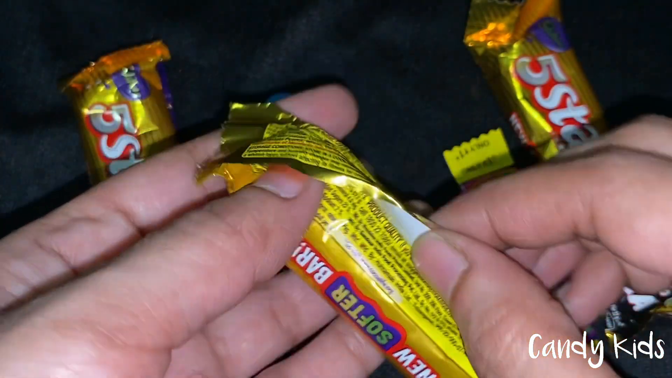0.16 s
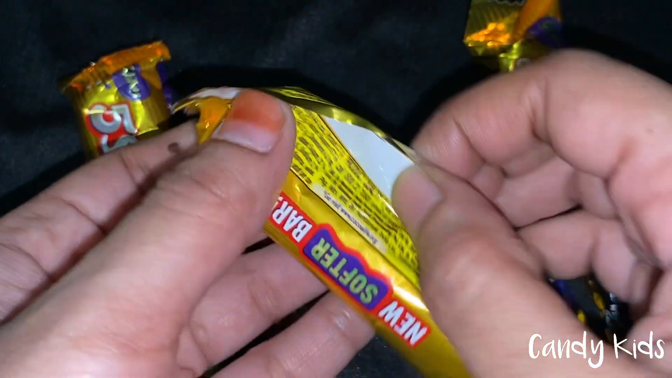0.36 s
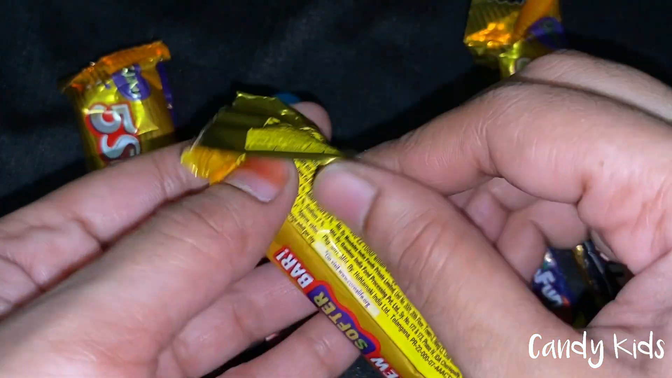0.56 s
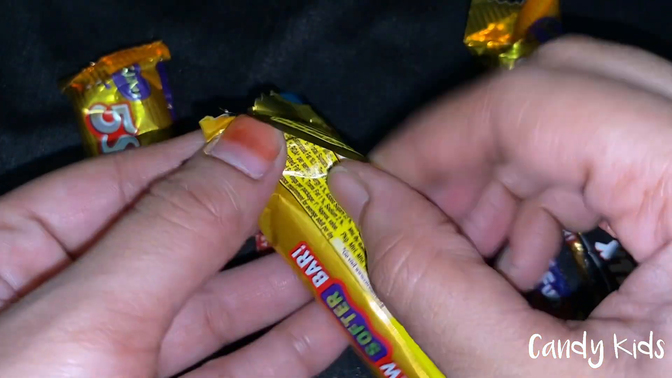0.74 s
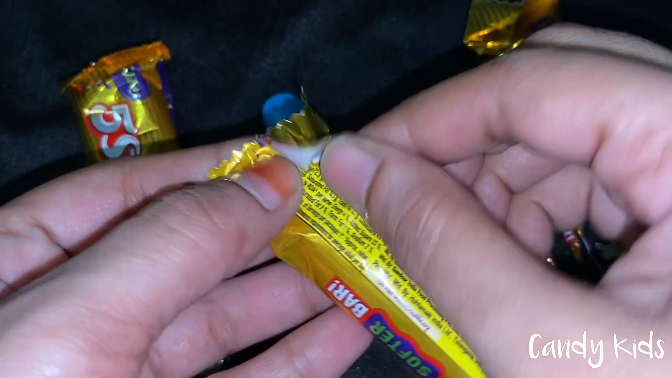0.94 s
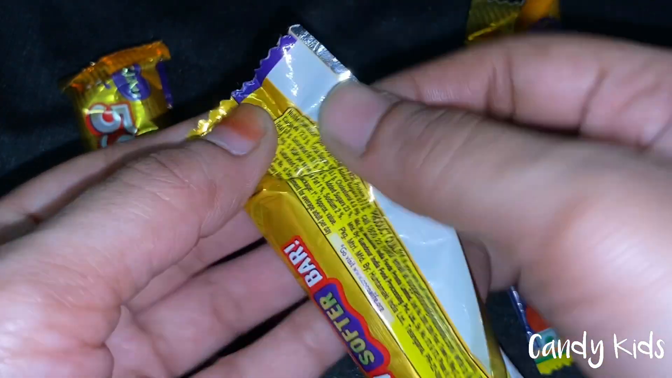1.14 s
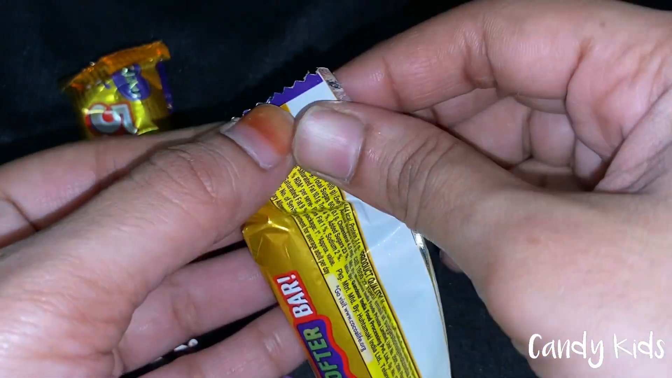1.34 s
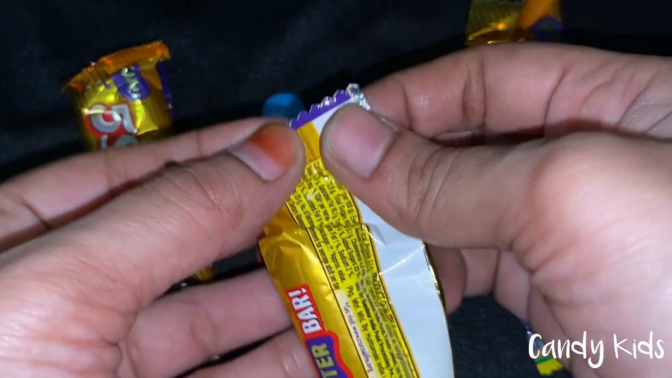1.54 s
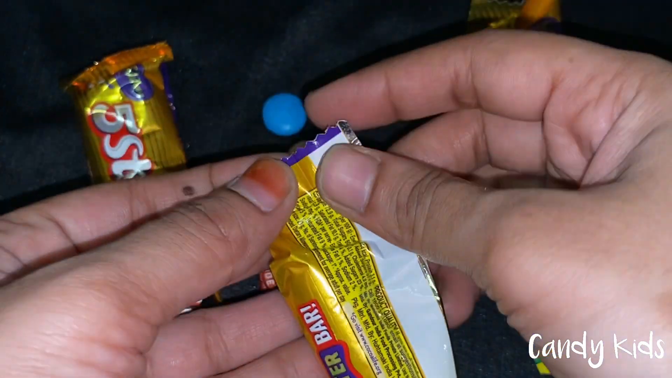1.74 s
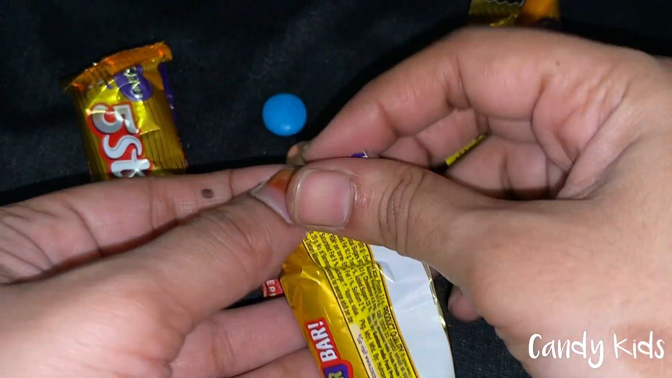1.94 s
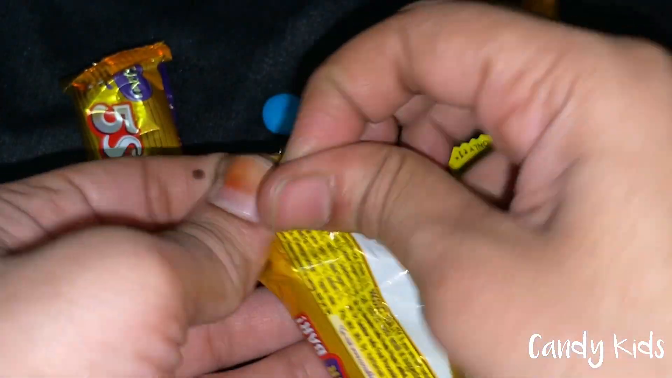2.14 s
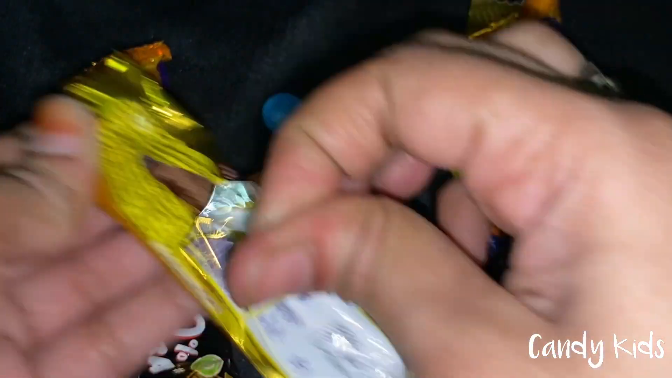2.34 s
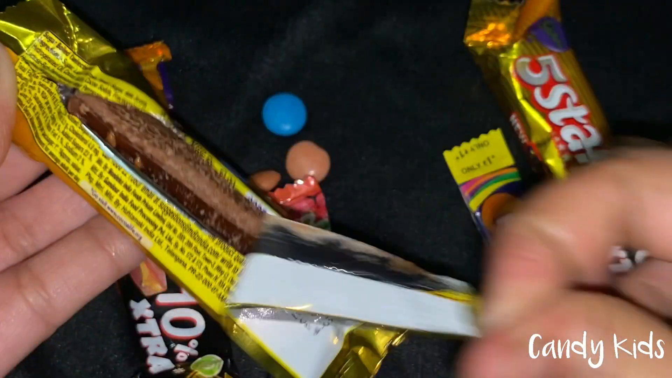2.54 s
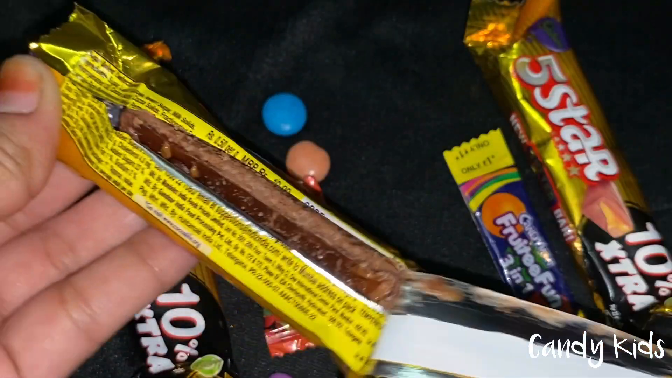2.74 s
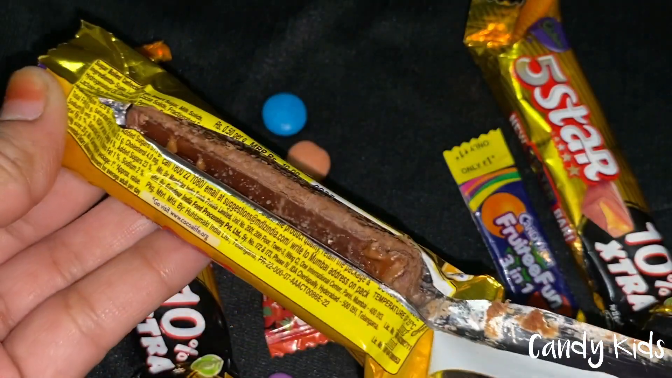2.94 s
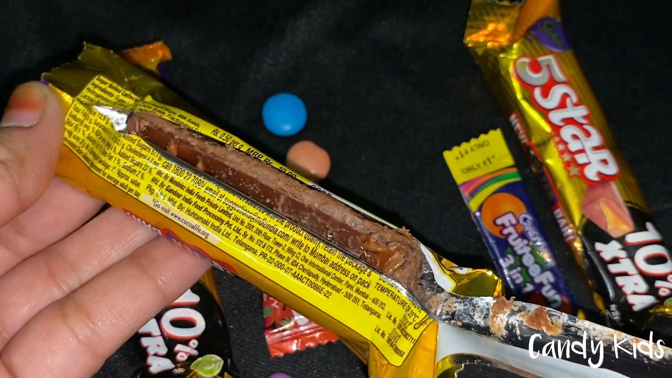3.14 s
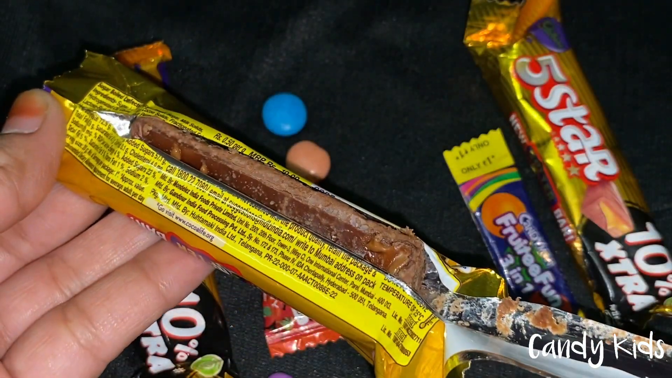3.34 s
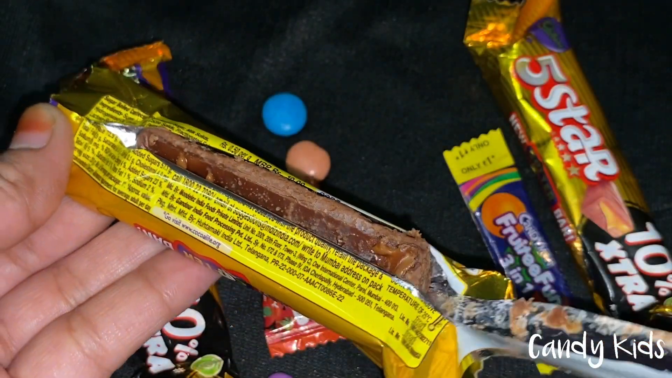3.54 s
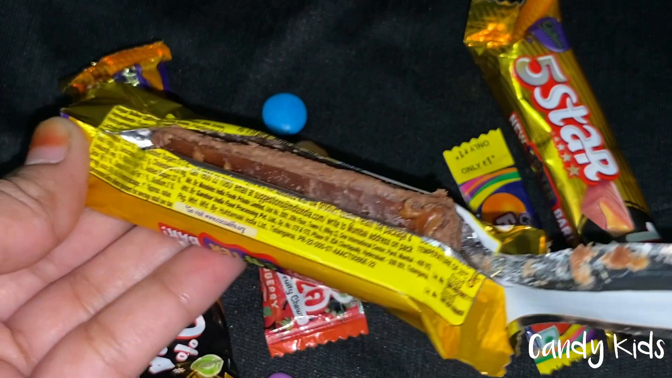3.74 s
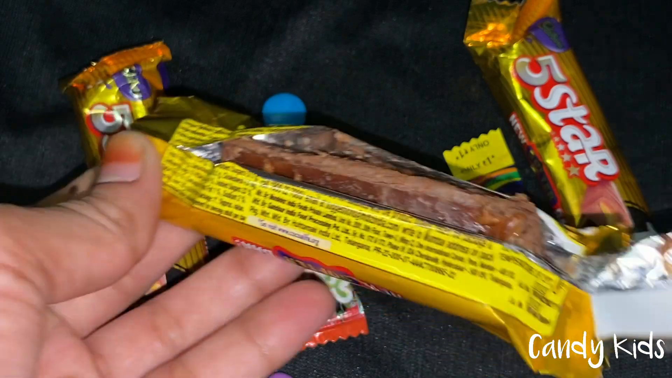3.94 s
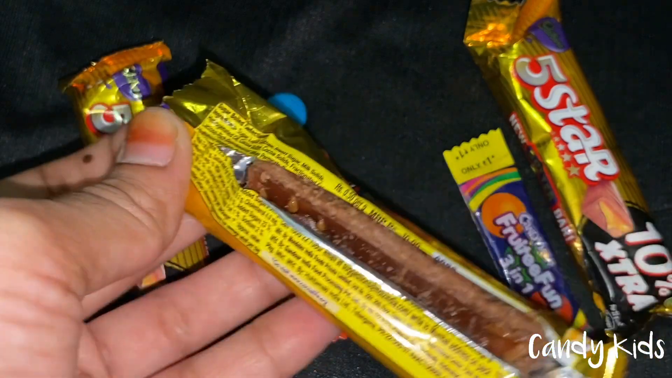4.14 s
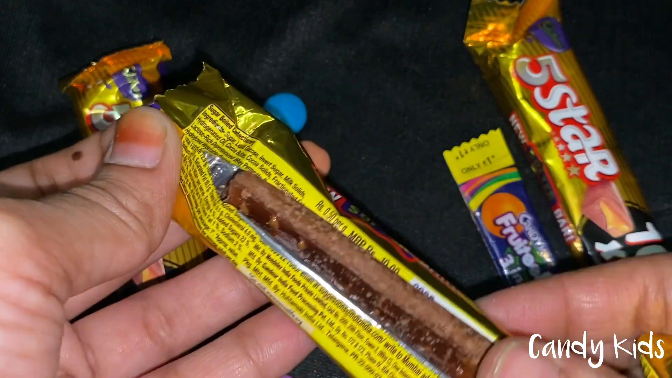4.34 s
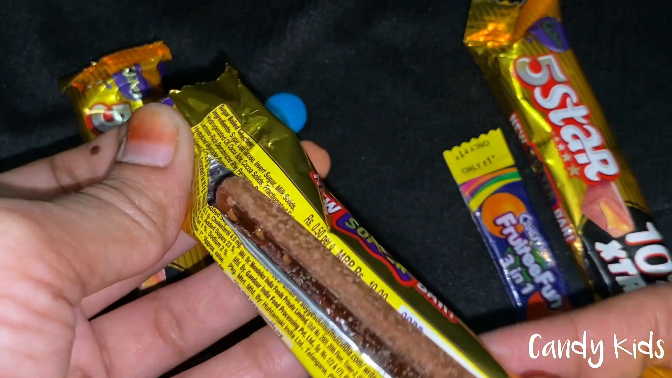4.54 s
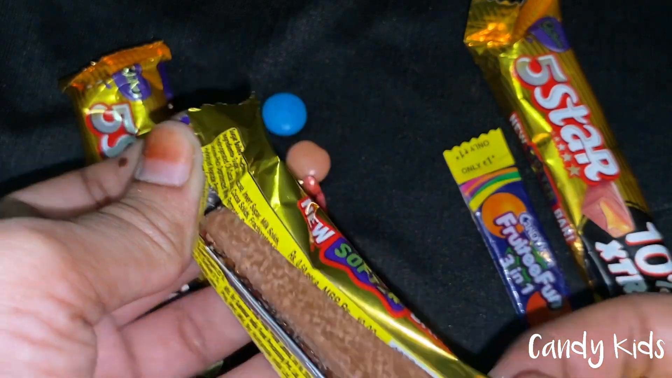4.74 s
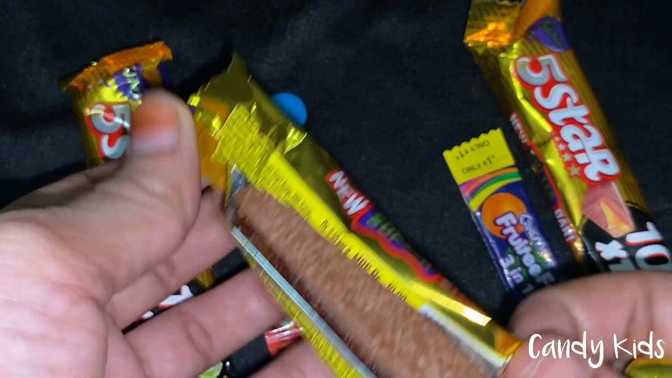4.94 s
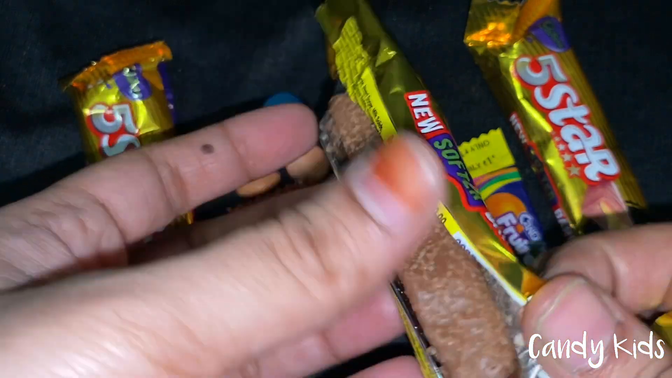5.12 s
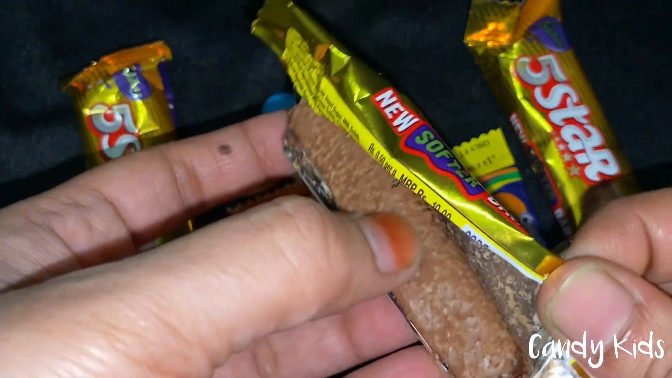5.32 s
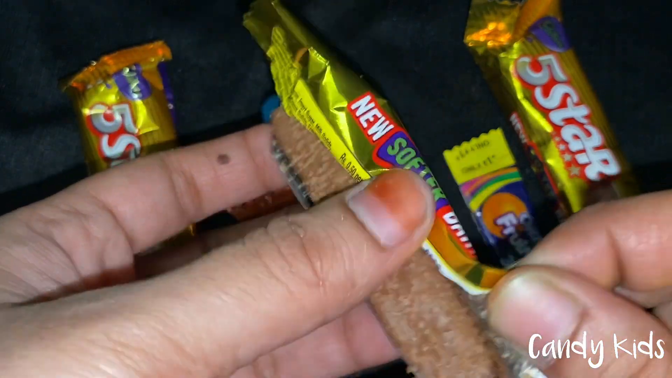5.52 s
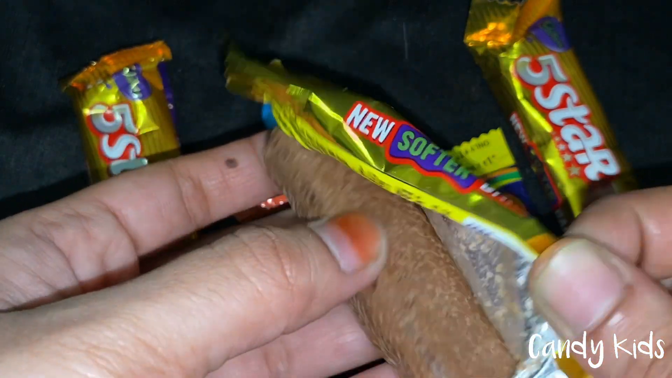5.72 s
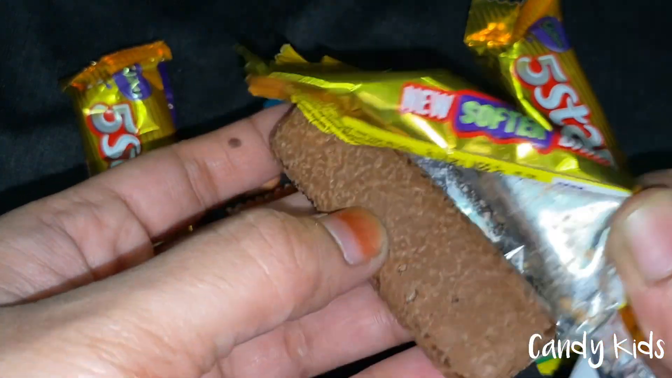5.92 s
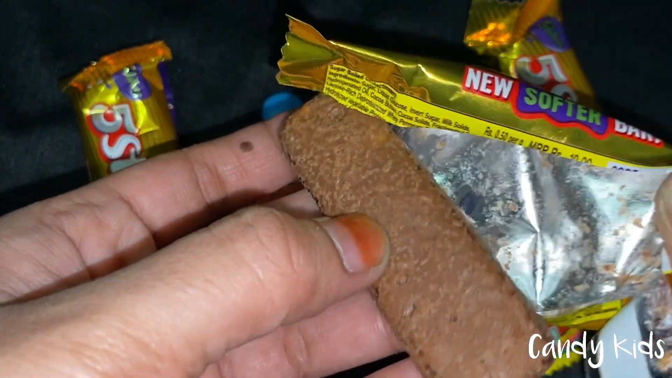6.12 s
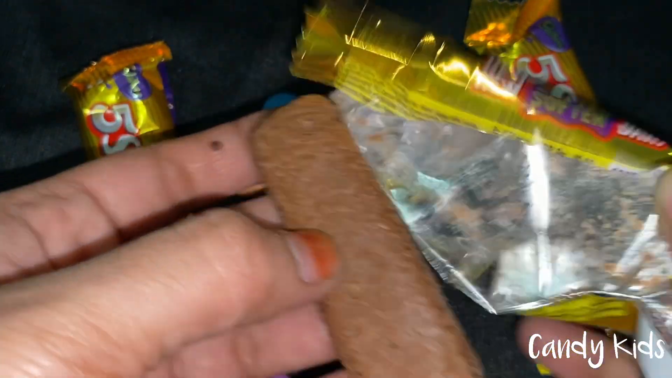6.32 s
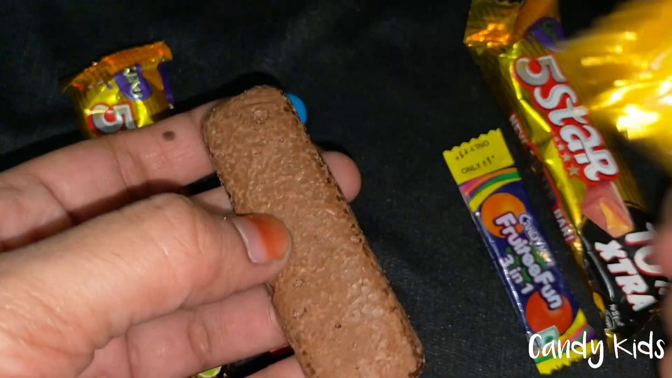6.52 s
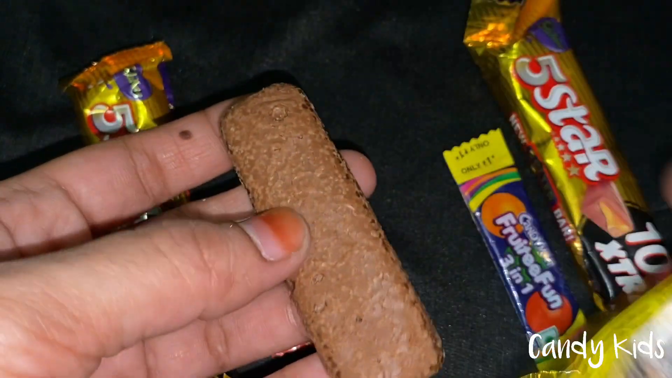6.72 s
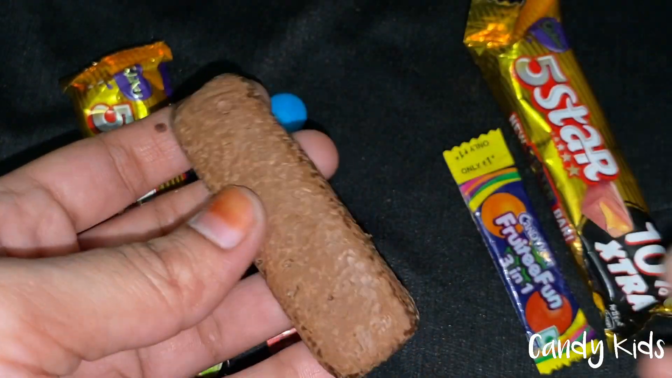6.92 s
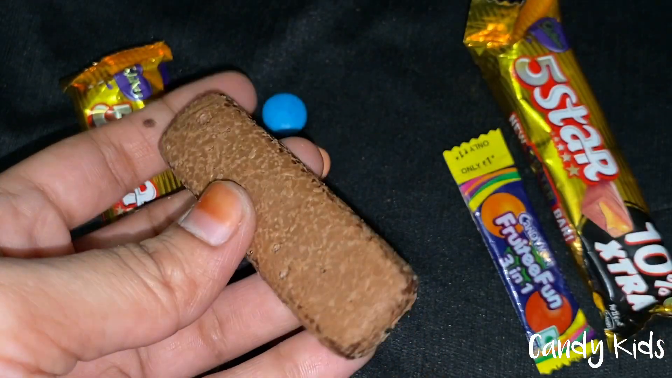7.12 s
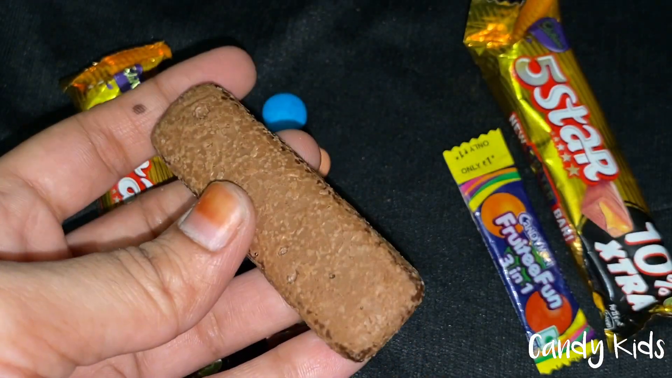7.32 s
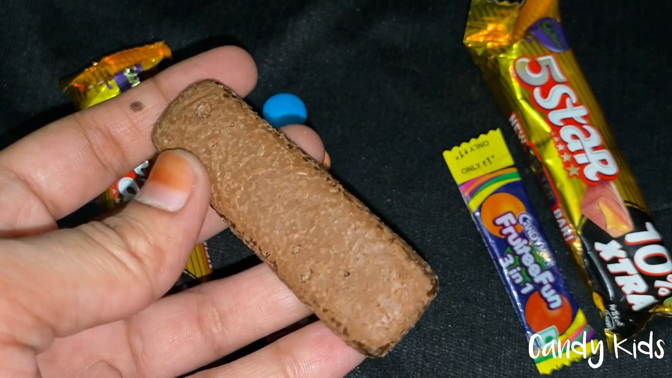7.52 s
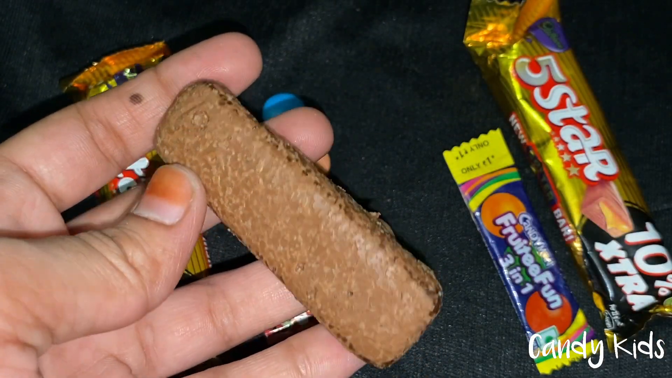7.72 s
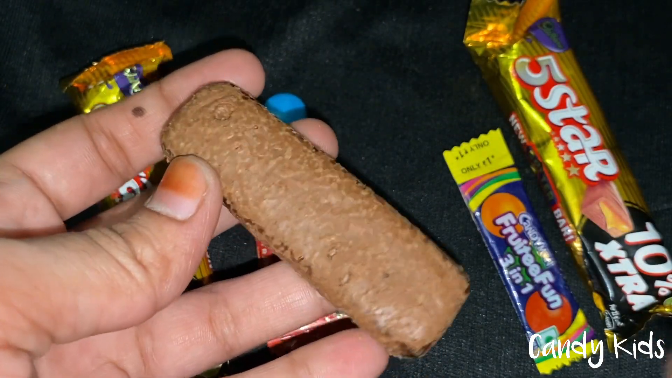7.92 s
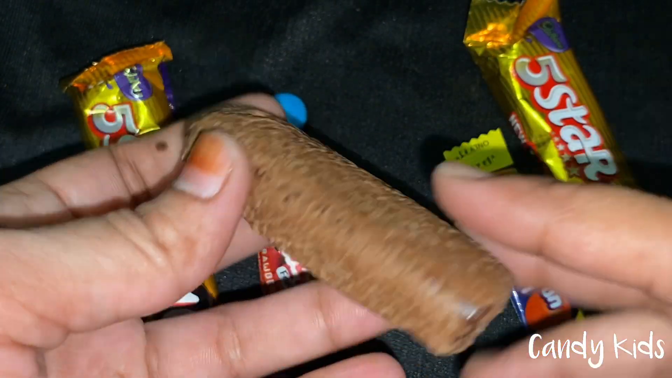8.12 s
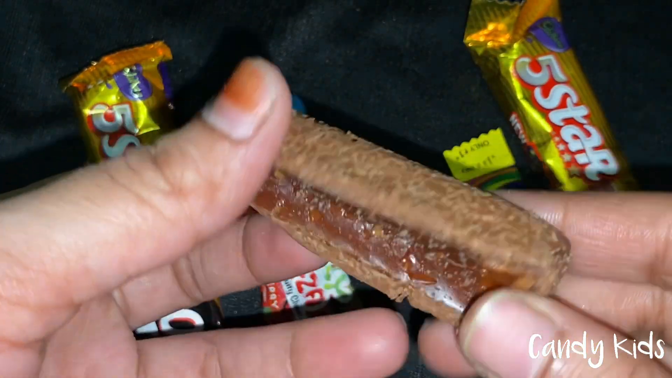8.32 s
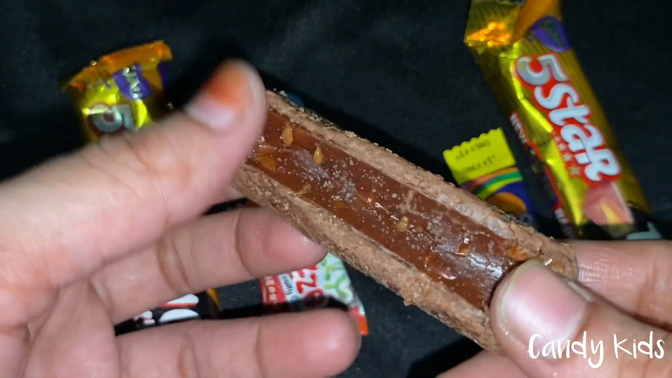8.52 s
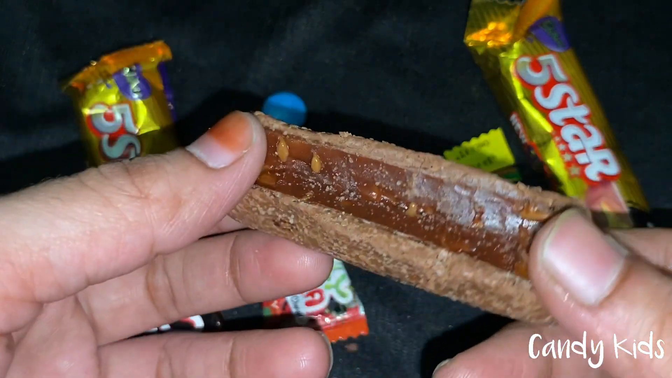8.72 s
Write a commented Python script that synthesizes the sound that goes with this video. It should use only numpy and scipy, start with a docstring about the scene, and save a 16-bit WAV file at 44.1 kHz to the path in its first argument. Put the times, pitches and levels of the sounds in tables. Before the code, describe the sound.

A foil candy wrapper is crinkled, torn open and pulled off by hand close to the microphone. It crackles in uneven bursts with sharp snaps, pauses briefly, then resumes with swishes and a few dull pops. The crinkling peaks as the empty wrapper is crumpled and laid aside. Small birds chirp with a slight echo in the background during the first two thirds, over a low rumble and faint hum.

```python
"""Unwrapping a candy bar

A foil wrapper is crinkled, torn open and pulled off close to a phone's two microphones.
Each squeeze of the fingers sets off a crackle, big creases buckle in single snaps, and the
slack foil slides and pops dully. Small birds chirp with an echo in the background,
over a low rumble with a little mains hum."""
import sys
import numpy as np
from scipy import signal
from scipy.fft import rfft, irfft
from scipy.io import wavfile

SR = 44100
rng = np.random.default_rng(int(sys.argv[2]) if len(sys.argv) > 2 else 0)


def wav_record(signal):
    """Record a signal, one row per channel, as 16-bit PCM in the file named by sys.argv[1]."""
    frames = np.transpose(np.atleast_2d(signal))
    bounded = np.clip(frames, -1, 1)
    # unit amplitude maps onto the largest positive 16-bit level
    quanta = np.round(bounded * 32767).astype(np.int16)
    wavfile.write(sys.argv[1], SR, quanta)


N = 386316
TIME = np.arange(N) / SR


def from_db(db):
    return 10 ** (np.asarray(db) / 20)


def rms_one(x):
    """Scale each row to an average power of 1."""
    return x / np.sqrt(np.mean(x ** 2, axis=-1, keepdims=True) + 1e-20)


def at_hz(points, hz):
    """Read a curve of (frequency, value) points on a logarithmic frequency axis."""
    points = np.array(points)
    return np.interp(np.log(hz + 1), np.log(points[:, 0]), points[:, 1])


def frequencies(size):
    return np.fft.rfftfreq(size, 1 / SR)


def wander(step_s):
    """A random curve that takes a new direction every step."""
    steps = TIME / step_s
    turns = np.clip(rng.standard_normal(int(steps[-1]) + 2), -2, 2)
    return np.interp(steps, np.arange(len(turns)), turns)


def place(times, sounds):
    """Add up short sounds at their start times, channel by channel."""
    at = (np.asarray(times) * SR).astype(int)[:, None] + np.arange(sounds.shape[-1])
    return np.array([np.bincount(np.maximum(at, 0).ravel(), channel.ravel(), N)[:N] for channel in sounds])


def echoes(x, fade_s, gap_s):
    """A wash of reflections, different at each microphone, that drops 60 dB in fade_s."""
    t = TIME[:SR]
    tail = rng.standard_normal((2, SR)) * from_db(-60 * t / fade_s) * (t > gap_s)
    return signal.fftconvolve(x[None], rms_one(tail) / np.sqrt(SR), axes=1)[:, :N]


# tone of the rumble and hiss: (frequency [Hz], relative level [dB])
RUMBLE_TONE = [(20, -25), (40, -9.5), (60, 3.5), (100, 1), (160, -5.5), (300, -15), (600, -24.5),
               (2000, -38), (3000, -38.5), (7000, -48.5), (16000, -48.5)]
# mains hum: (frequency [Hz], level [dB])
HUM = [(100, -50), (150, -56.5)]


def background(rumble_db=-42.5):
    """Steady rumble and mains hum, alike at both microphones; the hiss differs between them."""
    hz = frequencies(N)
    side_db = at_hz([(100, -14.0), (300, -6.0), (3000, -1.0)], hz)
    tone_db = at_hz(RUMBLE_TONE, hz) + np.outer([0, 1], side_db)
    mid, side = irfft(rfft(rng.standard_normal((2, N))) * from_db(tone_db), N)
    hum = sum(np.sqrt(2) * from_db(db) * np.sin(2 * np.pi * pitch * TIME) for pitch, db in HUM)
    return from_db(rumble_db) * (mid + side * [[1], [-1]]) / np.std(mid) + hum


def whistles(notes, waver_hz, flicker_db):
    """Each note (start, length, pitches, level) glides and quivers as it swells and fades."""
    song = np.zeros(N)
    quiver = waver_hz * wander(step_s=.003)
    flicker = from_db(flicker_db * wander(step_s=.01))
    for start, length, pitches, db in notes:
        at = np.flatnonzero((TIME >= start) & (TIME < start + length))
        progress = np.linspace(0, 1, len(at))
        hz = np.interp(progress, np.linspace(0, 1, len(pitches)), pitches) + quiver[at]
        swell = rms_one(np.sqrt(progress * np.abs(np.sin(np.pi * progress))) * flicker[at])
        song[at] += from_db(db) * swell * np.sqrt(2) * np.sin(2 * np.pi * np.cumsum(hz) / SR)
    return song


# gliding notes: (start [s], length [s], first pitch [Hz], last pitch [Hz], level [dB])
GLIDES = [(0, 0.0031, 7190, 7460, -18.5), (0.601, 0.072, 7700, 7600, -27.5),
          (0.952, 0.086, 7720, 6750, -24.5), (1.374, 0.076, 7280, 6470, -25.5),
          (2.973, 0.075, 3270, 3405, -35.5), (3.233, 0.12, 5440, 5555, -33), (3.461, 0.18, 2776, 3125, -30),
          (3.717, 0.039, 4520, 3400, -23.5), (3.938, 0.14, 4644, 4820, -28),
          (4.179, .21, 3044, 3840, -30.5), (4.795, 0.14, 3170, 3365, -35.5),
          (4.97, 0.085, 4020, 4505, -31.5), (5.51, 0.058, 7100, 6550, -36), (5.629, 0.046, 4590, 4325, -29)]
# a flourish whips up and falls back, in equal steps of time: (pitch [Hz])
FLOURISH_HZ = [3700, 3700, 3900, 3970, 4580, 5030, 4580, 3900]
# the flourishes: (start [s], length [s], level [dB])
FLOURISHES = [(2.592, 0.092, -29.5), (2.882, .117, -26.5)]


def far_bird(arch=1.0252):
    """A rough song of flourishes and of glides that bow upwards in the middle."""
    glides = [(start, length, [first, (first + last) / 2 * arch, last], db)
              for start, length, first, last, db in GLIDES]
    flourishes = [(start, length, FLOURISH_HZ, db) for start, length, db in FLOURISHES]
    return whistles(glides + flourishes, waver_hz=90, flicker_db=5)


def bending(hz, lag_s):
    """High notes run through foil faster, so the lows arrive late (by lag_s at 1 kHz)."""
    return np.exp(-4j * np.pi * lag_s * np.sqrt(1000 * hz))


# tone of a typical crease: (frequency [Hz], relative level [dB])
FOIL_TONE = [(150, -6.5), (400, -9.5), (850, -3), (1700, -1), (2700, -3.5), (5000, 0.5), (7500, -0.5),
             (9500, -3), (11500, -9), (15500, -11)]


def buckles(body_db, treble_db, flutter_db, facet_db, size, rise_s=.0005, snap_s=.00045, flutter_s=.003):
    """One click per buckling crease, all equally strong; the sheet flutters briefly after each."""
    hz, count = frequencies(size), len(body_db)
    t = np.maximum(np.arange(size) / SR - .0005, 0)
    decay = np.exp(-t / snap_s) + from_db(flutter_db) * np.exp(-t / flutter_s)
    envelope = (1 - np.exp(-t / rise_s)) * decay
    # each crease reaches the two microphones a little differently
    mid, side = rng.standard_normal((2, count, size)) * envelope
    side *= from_db(-16.5)
    burst = np.array([mid + side, mid - side])
    # big facets (flat patches of foil) add body, below 2.7 kHz; small ones add treble, above 8 kHz
    body = np.outer(body_db, at_hz([(2200, 0.95), (3400, 0.0049)], hz))
    treble = np.outer(treble_db, at_hz([(5500, 0.11), (9500, 0.99)], hz))
    # every facet favours a pitch of its own
    facet_hz = 3800 * 2 ** rng.uniform(-1.12, 1, (count, 1))
    ring = facet_db * np.exp(-10 * np.log2((hz + 1) / facet_hz) ** 2)
    tone = from_db(at_hz(FOIL_TONE, hz) + body + treble + ring)
    return rms_one(irfft(rfft(burst) * tone * bending(hz, lag_s=.0007))) / np.sqrt(size)


def fingers(movements, attack_s=.012, release_s=.028):
    """Effort on the foil and its body in dB: every movement builds up, holds and lets go."""
    power, body = np.full(N, 1e-14), np.zeros(N)
    for start, length, db, body_db in movements:
        at = slice(*np.searchsorted(TIME, [start, start + length + 10 * release_s]))
        t = TIME[at] - start
        envelope = np.minimum(t / attack_s, 1) * np.exp(-np.maximum(t - length, 0) / release_s)
        push = (from_db(db) * envelope) ** 2
        power[at] += push
        body[at] += push * body_db
    return np.sqrt(power), body / power


def crackle(effort, body, treble_db, per_s, spread_db, level_db, variety_db=4):
    """Many small creases buckle: harder handling makes them louder and more frequent."""
    rate = per_s * np.sqrt(effort / np.mean(effort))
    at = np.flatnonzero(np.diff(np.floor(np.cumsum(rate) / SR)))
    jitter, loudness, low_shift, high_shift = rng.standard_normal((len(at), 4)).T
    times = np.abs(at / SR + .5 * jitter / np.maximum(rate[at], per_s))
    spread = rms_one(from_db(spread_db * np.clip(loudness, -2, 2)))
    strength = spread * effort[at] * np.sqrt(SR / rate[at])
    low = body[at] + variety_db * low_shift
    high = treble_db - 0.18 * body[at] + variety_db * high_shift   # big facets are duller
    clicks = buckles(low, high, flutter_db=-22, facet_db=9, size=512)
    return place(times, clicks * strength[:, None] * from_db(level_db))


# the fingers keep stirring the foil lightly: (start [s], length [s], level [dB], body [dB])
HANDLING = [(0, 1.2, -39, 13), (1.27, .3, -47, 0.5), (1.88, .95, -48, 12), (3.601, 2.0, -50, 6),
            (5.597, 1.6, -41, 16)]


def rustle():
    """Tiny creases blur into a fine rustle under both light handling and squeezes."""
    return crackle(*fingers(SQUEEZES + HANDLING), treble_db=0.5, per_s=750, spread_db=3, level_db=-9)


def settling_ticks(level_db=-45.5):
    """Creases settle with lone bright ticks while the foil is held."""
    held = [(start, length, level_db, body_db) for start, length, _, body_db in HANDLING]
    return crackle(*fingers(held), treble_db=9, per_s=22, spread_db=4, level_db=0)


# one clear whistle: (start [s], length [s], pitches [Hz], level [dB])
OPENING_WHISTLE = (.066, .1, [3850, 4150, 4185], -21.5)
# a fainter bird repeats one falling chirp: (start [s])
CHIRPS = [.775, 1.356, 1.548, 1.747, 1.96]


def near_birds():
    """One bird whistles, then gives four pips, each a little lower; a fainter one chirps."""
    first_s, step_s, pip_s, pip_hz, fall_hz, pip_db = .203, .077, .028, 3670, 45, -28.5
    chirp_s, chirp_hz, chirp_db = .046, [4350, 3560], -50.5
    pips = [(first_s + k * step_s, pip_s, pip_hz - fall_hz * np.array([k - 1, k + 1]), pip_db)
            for k in range(4)]
    chirps = [(start, chirp_s, chirp_hz, chirp_db) for start in CHIRPS]
    return whistles([OPENING_WHISTLE] + pips + chirps, waver_hz=25, flicker_db=2)


def birds():
    """The far bird is heard mostly as echo, the near ones more directly; all sit a little right."""
    far, near = far_bird(), near_birds()
    reflected = echoes(from_db(0.5) * far + from_db(1.5) * near, fade_s=0.34, gap_s=0.0036)
    return (from_db(-13) * far + near + reflected) * from_db([[-1.6], [1.6]])


# squeezes and pulls of the fingers: (start [s], length [s], level [dB], body [dB])
SQUEEZES = [(0.092, .16, -30, -7.5), (0.399, .22, -27, 1), (.69, .18, -31, 0.5), (.89, .13, -29.5, -6),
            (1.11, .08, -35, -2.5), (1.379, .09, -36, -3), (2.205, .04, -26, 6), (2.281, .16, -33.5, 3),
            (2.71, .10, -34, -3.5), (3.60, .04, -39, -2), (4.04, .06, -35, 4.5), (4.209, .12, -36, 5),
            (4.64, .11, -36, -3), (4.839, .05, -31, 8.5), (5.168, .06, -38, 3), (5.388, .05, -38, 7),
            (5.53, .07, -37.5, -2.5), (5.651, .18, -34, 3.5), (5.87, .19, -31, 4.5), (6.142, .08, -33, 12),
            (6.31, .025, -28, 8.5), (6.44, .16, -32, -1.5), (6.62, .05, -21, 2), (6.699, .17, -29, 0.5),
            (6.91, .06, -24, 2.5), (7.06, .09, -22, -4), (7.19, .25, -41, -3.5), (7.42, .02, -26, -10),
            (7.50, .08, -39, 1), (7.789, .06, -48, 0), (7.909, .025, -36, 7)]


def squeeze_ticks():
    """Each squeeze buckles a handful of creases in coarse, uneven ticks."""
    return crackle(*fingers(SQUEEZES), treble_db=4, per_s=95, spread_db=6, level_db=-1.5)


# the loudest creases buckling: (time [s], level [dB], relative body [dB], relative treble [dB])
SNAPS = [(0.1036, -7, -16.5, -19), (0.1185, -6.5, -19.5, -13.5), (0.166, -4.5, -25, -14.5),
         (0.2387, -10, -8, -24), (0.2455, -7.5, -9.5, -27), (0.3252, -6, -21, -17.5),
         (0.3855, -3, -24, -19), (0.4857, -9.5, -8, -19), (0.4963, -4.5, -8, -21), (0.524, -8, -37, -16),
         (0.5784, -11, -19.5, -28), (0.621, -6, -16.5, -20.5), (0.6991, -10.5, -4, -28),
         (0.7547, -11.5, -9.5, -23), (0.812, -9, 5, -10), (0.901, -9.5, -5.5, -7.5),
         (0.9638, -11, -11.5, -25), (0.9847, -12.5, -32, -7.5), (0.9929, -7.5, -15, -22),
         (1.0301, -14, -14, -34), (1.0707, -10.5, -18, -24), (1.1165, -5.5, -21.5, -28.5),
         (1.1301, -4.5, -38, -27), (1.1794, -6.5, -24.5, -23.5), (1.3381, -13.5, -13, -19.5),
         (1.4002, -13, -13.5, -29), (1.476, -5, -24, -30), (1.7444, -17, -26, -8), (1.882, -12.5, -20, -30),
         (1.9113, -14, -18, -65), (1.9991, -8.5, -20, -16), (2.0517, -16.5, -21, -18.5),
         (2.1361, -4, -39, -21.5), (2.1806, -11, -23, -12.5), (2.2174, -1, -25.5, -21.5),
         (2.2377, -2.5, -17, -22.5), (2.3141, -9.5, -11, -14), (2.402, -13.5, -28, -6),
         (2.488, -0.5, -38, -13.5), (2.4926, -10.5, -7, -14.5), (2.5137, -12, -9, -11),
         (2.728, -8, -24, -12), (2.7711, -8.5, -17, -17.5), (2.855, -16, -12.5, -24),
         (3.616, -18.5, -16, -11), (3.6394, -17, -6, -18), (4.032, -9.5, -19, -19),
         (4.2185, -9, -19, -19.5), (4.2398, -9, -8.5, -20), (4.301, -8, -30, -20), (4.4918, -16, -30, -32),
         (4.59, -15.5, -1, -34), (4.6658, -9, -21, -21), (4.694, -6.5, -6, -9.5), (4.7155, -7, -19.5, -33),
         (4.7511, -8.5, -61, -8), (4.8645, -9, -15, -20), (5.0549, -10.5, -31.5, -27.5),
         (5.176, -14.5, -12, -26), (5.203, -8, -17, -17.5), (5.335, -5.5, -14.5, -19.5),
         (5.4206, -9, -18, -20), (5.465, -14.5, -12.5, -17.5), (5.556, -16, -10, -12),
         (5.5707, -10, -34, -4), (5.687, -11.5, -14.5, -20.5), (5.7484, -9.5, -21.5, -21),
         (5.8052, -7.5, -14, -25.5), (5.8105, -7.5, -15.5, -21), (5.8308, -12, -15.5, -24),
         (5.8745, -8.5, -20, -23.5), (5.962, -6, -4, -18), (5.9803, -5, -32.5, -44),
         (6.0726, -16.5, -8, -68), (6.1536, -9, -7, -34.5), (6.2083, -16, -14, -25.5),
         (6.3186, -13, -7.5, -22.5), (6.402, -10.5, -24.5, -11), (6.4459, -8, -11, -14),
         (6.4534, -6, -6.5, -12), (6.5112, -15, -20, -21), (6.535, -9, -6, -7.5), (6.607, -10.5, -42, -17),
         (6.6396, -6, -22, 9), (6.6543, -3, -17.5, -39), (6.6647, -9, -8.5, -29), (6.7082, -11, -21, -20),
         (6.7254, -13.5, -12, -15.5), (6.8221, -6.5, -4.5, -16), (7.0335, -8.5, -11.5, -17),
         (7.0538, -6.5, -8.5, -14.5), (7.0831, 0.5, -9, -20.5), (7.1145, -8.5, -23, -19),
         (7.127, -11.5, -22.5, -19), (7.1545, -14, -22.5, -22.5), (7.1617, -10.5, -15, -17.5),
         (7.193, -10.5, -17, -7), (7.3014, -16, -27, -11), (7.363, -18, -31, -31), (7.429, -10.5, -20, -24),
         (7.517, -15, -55, -20), (7.6611, -21, -15, -25), (8.2485, -28.5, -18, -32.5),
         (8.7008, -21, -8, -21)]


def snaps(follow_s=(.0015, .005), follow_db=-13, spread_db=4, low_cut_hz=1240):
    """A big crease snaps and tips its neighbour over a moment later, more softly."""
    delay, loudness = rng.random((len(SNAPS), 2)).T
    neighbours = np.array(SNAPS, float)
    neighbours[:, 0] += np.interp(delay, [0, 1], follow_s)
    neighbours[:, 1] += follow_db + spread_db * (2 * loudness - 1)
    times, db, body, treble = np.concatenate([SNAPS, neighbours]).T
    clicks = buckles(body + 13, treble + 22, flutter_db=-29, facet_db=5, size=1024)
    strength = from_db(db - 2) * np.sqrt(SR / 1000)
    placed = place(times, clicks * strength[:, None])
    # a crease is too small to give off much bass
    return signal.lfilter(*signal.butter(1, low_cut_hz, "high", fs=SR), placed + 1e-18)


# foil slides under a finger or over the candy: (start [s], length [s], level [dB], body [dB])
SLIDES = [(1.75, .085, -32, 3.5), (2.2, .05, -24.5, -1), (3.85, .12, -41, 1), (4.02, .07, -28, -3),
          (6.257, .06, -25, -0.5), (7.385, .05, -23.5, -6)]


def swishes():
    """A slide gathers speed more slowly than a squeeze; its even clicks merge into a swish."""
    return crackle(*fingers(SLIDES, attack_s=.07), treble_db=4, per_s=400, spread_db=0, level_db=-5)


# slack foil popping over: (time [s], peak level [dB], centre pitch [Hz])
POPS = [(2.318, -28, 440), (2.342, -27.5, 480), (2.38, -24.5, 590), (2.413, -30, 443), (2.443, -29, 520),
        (4.866, -25.5, 597), (5.979, -18.5, 467), (6.073, -19, 566), (6.16, -18, 199), (7.432, -26.5, 355)]


def pops(width_octaves=0.77):
    """A wide panel of foil flips over: a dull pulse that sweeps downwards."""
    times, db, centre_hz = np.transpose(POPS)
    hz = frequencies(2048)
    tone = np.exp(-.5 * (np.log2((hz + 1) / centre_hz[:, None]) / width_octaves) ** 2)
    pulses = irfft(tone * bending(hz, lag_s=.003))
    pulses /= np.abs(pulses).max(axis=1, keepdims=True)
    peak_s = np.abs(pulses).argmax(axis=1) / SR
    return place(times - peak_s, pulses[None] * from_db(db)[:, None])


# the wrapper rings hollow at first, and again once emptied and balled up: (time [s], level [dB])
HOLLOWNESS = [(0, 4), (2.2, -16.5), (5.5, -24), (6.4, -2.5), (7.4, 4), (7.65, -7.5)]


def air_pockets(foil, width_hz=280, level_db=-4, swing_db=7):
    """Add the ring of five air pockets; which one rings most shifts as the foil folds."""
    ringing = 0
    for hz in np.geomspace(2350, 3850, 5):
        opening = from_db(level_db + swing_db * wander(step_s=.03))
        ringing += signal.lfilter(*signal.iirpeak(hz, hz / width_hz, fs=SR), foil * opening)
    return foil + from_db(np.interp(TIME, *np.transpose(HOLLOWNESS))) * ringing


# the wrapper is laid aside, farther from the microphones: (time [s], echo level [dB])
LAID_ASIDE = [(7.15, -18.5), (7.42, -9.5)]


def foil_echo(foil):
    """Close foil has hardly any echo; the echo grows as the wrapper moves away."""
    share = from_db(np.interp(TIME, *np.transpose(LAID_ASIDE)))
    return echoes(share * foil.mean(axis=0), fade_s=0.43, gap_s=0.005)


def scene():
    """The wrapper in front, with birds, rumble and hum behind it."""
    creases = squeeze_ticks() + settling_ticks() + rustle() + swishes() + snaps()
    foil = air_pockets(creases) + pops()
    return foil + foil_echo(foil) + birds() + background()


# how much louder the left microphone is than the right: (frequency [Hz], level [dB])
BALANCE = [(60, 4), (1400, 4.5), (2800, 0.4)]


def record(dry, lag_s=.000227, lag_above_hz=6800, cutoff_hz=16100):
    """The left microphone gets more bass and slightly late treble; peaks clip, the top is cut."""
    hz = frequencies(N)
    microphones = from_db(np.outer([.5, -.5], at_hz(BALANCE, hz))).astype(complex)
    microphones[0] *= np.exp(-2j * np.pi * lag_s * np.maximum(hz - lag_above_hz, 0))
    heard = np.clip(irfft(rfft(dry) * microphones, N), -1, 1)
    return signal.sosfilt(signal.ellip(10, .2, 70, cutoff_hz, fs=SR, output="sos"), heard)


dry = scene()
out = record(dry)
wav_record(out)
```